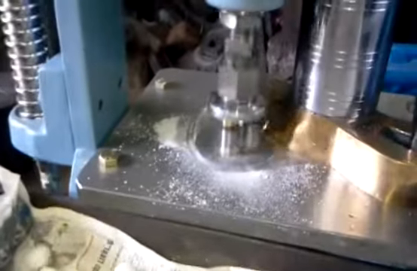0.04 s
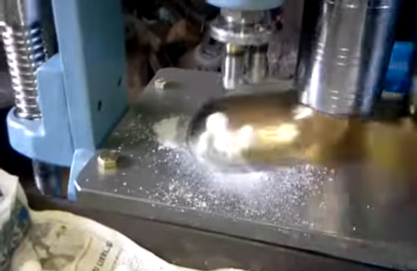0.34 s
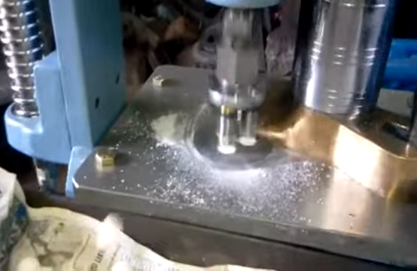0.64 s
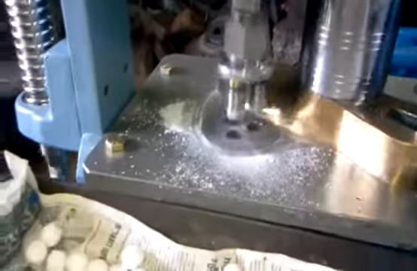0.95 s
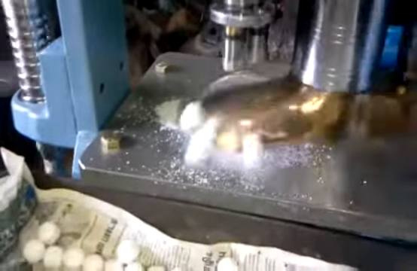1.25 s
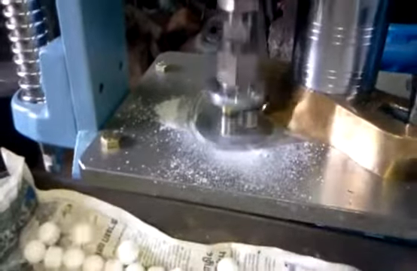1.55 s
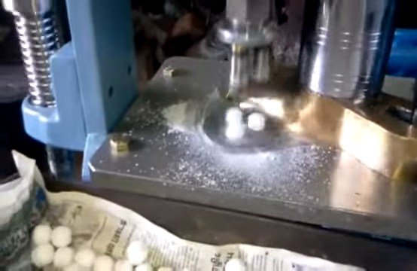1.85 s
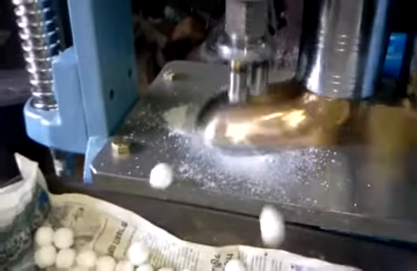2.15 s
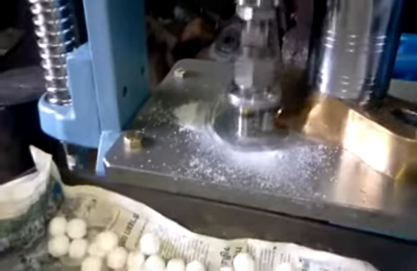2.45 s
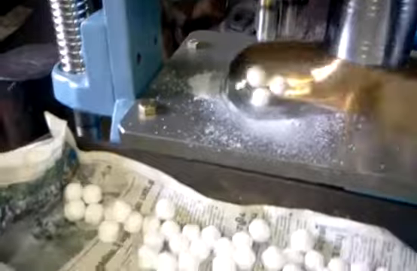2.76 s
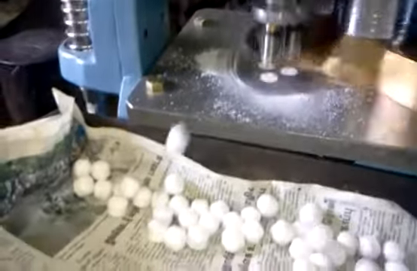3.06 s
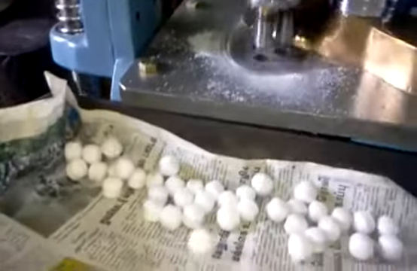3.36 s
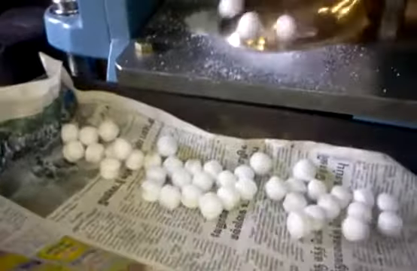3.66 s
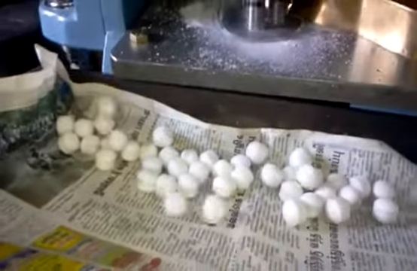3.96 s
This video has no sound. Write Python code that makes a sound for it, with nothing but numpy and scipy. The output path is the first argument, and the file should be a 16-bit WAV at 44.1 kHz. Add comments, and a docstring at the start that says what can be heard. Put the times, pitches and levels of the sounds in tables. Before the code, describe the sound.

Close, rhythmic clacking from a powder press repeats a little faster than once a second. Each cluster of ringing steel knocks trails into rattling and a light tap, while rubbing metal hisses and squeals faintly above the workshop's motor rumble.

```python
"""A workshop, close to a small single-punch press that stamps powder into balls.
Each turn of the cam knocks the feed shoe across the die: a tick, three hard clacks, a loose rattle,
then light taps and the clink of the punch dropping back. Every hit is a short crunch with a metal ring.
Between the clacks sliding steel sings thinly and squeals, over the motor's hum and a low rumble."""
import sys
import numpy as np
from scipy import signal
from scipy.fft import rfft, irfft
from scipy.io import wavfile
from scipy.ndimage import uniform_filter1d

SR = 44100
rng = np.random.default_rng(int(sys.argv[2]) if len(sys.argv) > 2 else 0)


def dump_mix(stems):
    """Bounce the given channels to the path in sys.argv[1] as a 16-bit WAV at rate SR."""
    frames = np.atleast_2d(stems).T  # one column per channel
    limited = np.clip(frames, -1, 1)  # hard clip at full scale
    pcm = np.round(limited * 32767).astype(np.int16)
    wavfile.write(sys.argv[1], SR, pcm)


N = 176400

# one stroke for each turn of the cam: start_s, level_db
CAM_STROKES = [(-0.264, -1.5), (0.5518, -4), (1.3684, -2.5), (2.1848, -2), (3.0009, -1.5), (3.8174, -4)]
# the knocks in every stroke: offset_s, level_db, rise_s, decay_s, bass_db, snap_db, treble_db, ring_db
STROKE_KNOCKS = [(-.0298, -25.5, 0.0024, 0.0029, -7, -4.5, 3.5, 3),
                 (-.0015, -14.5, 0.0047, 0.0032, -1, 6, 5.5, -3.5),
                 (0.0192, -20.5, 0.0023, 0.0093, -5.5, -4, -4, -3.5),
                 (0.0484, -14.5, 0.0033, 0.0069, -5.5, 5, 4.5, 2.5),
                 (.095, -15.5, 0.0048, 0.006, -0.5, 6.5, 6, 0.5),
                 (.107, -14.5, 0.0018, 0.0035, -18, -10.5, -5, -1),
                 (0.409, -44, 0.0053, 0.0061, 14, -4, -10, -1.5),
                 (.627, -32, 0.0036, 0.0041, -4.5, -5, 0, -12.5)]
# bounces of the loose linkage: start_s, level_db, snap_db, treble_db
LINKAGE_BOUNCES = [(0.013, -26.5, -11, -7), (0.723, -23, -7, 5), (0.728, -19, -1, -1.5),
                   (0.745, -21.5, 9.5, 1.5), (0.774, -31, 5, 0), (0.829, -27, -5, -4),
                   (1.298, -49.5, 2, 20), (1.389, -22.5, -8, -2), (1.537, -25, 1, 3), (1.543, -21, 6, 6),
                   (1.562, -20, 2.5, 0.5), (1.598, -27, 1.5, 0), (1.644, -27.5, -21, -4),
                   (2.35, -26, -9, 3), (2.358, -20.5, 2, 4.5), (2.379, -21.5, 2.5, 2.5),
                   (2.408, -32, 5.5, 4), (2.461, -27, -21, -7), (3.022, -26, -2, 4), (3.174, -24, 1, 4.5),
                   (3.179, -16, -4.5, -3), (3.198, -19, 4, -2), (3.24, -28, 2.5, -2),
                   (3.277, -26.5, -20, -21), (3.988, -25, 2.5, 3), (3.996, -25.5, 4, 11)]
# the punch dropping back once a turn: start_s, level_db
PUNCH_DROPS = [(0.280, -32.5), (1.096, -33.5), (1.911, -34.5), (2.729, -33), (3.544, -33.5)]
# tone of the steel-on-steel crunch: frequency_hz, level_db
CONTACT_SPECTRUM = [(100, -17.5), (260, -15.5), (420, -11), (760, -8), (930, -10), (1400, 7.5), (1800, 3),
                    (2380, -6), (2880, 0), (4100, -9.5), (4700, -4), (5800, -14), (6650, -7.5), (7500, -12),
                    (8600, -26)]
# tone of the cast frame ringing on: frequency_hz, level_db
FRAME_SPECTRUM = [(100, -11.5), (250, -12.5), (420, -1.5), (720, 3.5), (950, -3), (1450, 5), (2300, -5),
                  (3000, -13.5), (4000, -11.5), (6000, -16), (8500, -29.5)]
# modes of the frame and shoe: pitch_hz, level_db, t60_s
FRAME_MODES = [(391, -17, .36), (474, -18, .25), (810, -16, .2), (1345, 0, .06), (1442, -4.5, .24),
               (1659, 0, .1), (1874, -6.5, .17), (2700, -2, .06), (2810, -2, .09), (2934, -1.5, .08),
               (3440, -5, .08), (4773, -10, .15), (6720, -6, .05)]
# modes of the punch: pitch_hz, level_db, t60_s
CLINK_MODES = [(2635, 8, 0.088), (2944, 7.5, 0.057)]

# resonances of sliding steel, in four layers from low to high: pitch_hz, width_hz, level_db
LOW_SING_BANDS = [(2112, 43, 3.5), (2201, 40, -2.5), (1935, 60, -2)]
HIGH_SING_BANDS = [(4813, 300, 2), (6560, 990, 2)]
WHISTLE_BANDS = [(6430, 80, 0.0011), (6575, 230, 0.022)]
FIZZ_BANDS = [(7856, 340, 9.5), (8080, 69, 1.5), (7700, 1000, 5)]
# fader moves for those four layers: time_s, level_db
LOW_SING_FADER = [(0, -59), (.17, -50), (.85, -65), (1.3, -70), (1.72, -46), (2.14, -53.5), (2.8, -49),
                  (3.45, -55), (4, -48.5)]
HIGH_SING_FADER = [(0, -52), (.17, -53), (.72, -59), (.87, -62.5), (1.28, -60.5), (1.75, -51.5),
                   (2.13, -53.5), (2.66, -53), (3.25, -53), (3.44, -55.5), (3.58, -50), (4, -56)]
WHISTLE_FADER = [(0, -65), (.15, -48), (.38, -56.5), (.6, -44.5), (.9, -65.5), (1.4, -64), (1.8, -47),
                 (2.13, -52), (2.45, -52), (2.53, -46.5), (2.67, -45), (2.89, -50.5), (3.46, -54),
                 (3.59, -48), (3.72, -56)]
FIZZ_FADER = [(0, -66), (.24, -55.5), (.38, -66.5), (.52, -53), (.88, -84), (1.3, -77), (1.55, -56.5),
              (2, -53), (2.13, -61), (2.38, -53.5), (2.6, -57), (2.85, -51.5), (2.95, -61.5), (3.25, -50),
              (3.44, -64.5), (3.57, -50.5), (3.75, -62), (4, -53)]
# rubbing hiss that rides with the high singing: frequency_hz, level_db
HISS_SPECTRUM = [(1500, -19.5), (2500, 5), (4000, -1.5), (5600, -1), (7200, 3.5), (8600, -11.5)]
# notes where the steel binds: start_s, length_s, start_hz, end_hz, level_db
SQUEAL_NOTES = [(0.2, 0.029, 4740, 4730, -49), (0.461, 0.064, 2225, 2150, -48.5),
                (1.022, 0.017, 4750, 4670, -47), (1.66, 0.29, 2150, 2095, -51.5),
                (1.923, 0.21, 2105, 2053, -48), (3.727, 0.21, 4825, 4840, -45.5)]
# mains hum of the motor: pitch_hz, level_db
HUM_PARTIALS = [(99.5, -58), (199, -70)]
# running noise of motor and shop: frequency_hz, level_db
RUMBLE_SPECTRUM = [(10, 8.5), (28, 2.5), (40, -2.5), (55, -11), (90, -18), (140, -28), (200, -34),
                   (270, -33.5), (420, -29), (750, -31), (1000, -35.5), (1600, -29), (2600, -35.5),
                   (4500, -39), (8500, -55.5)]

SNAP_HZ, SNAP_WIDTH_HZ = 2910, 740  # the band in which a hard contact snaps
RING_DB, RING_DECAY_S, MODES_DB = -5.5, 0.02, -11
ROOM_DB, ROOM_T60_S = -19, 0.68
LIKENESS, KNOCK_SPREAD_DB = 0.62, -1.5  # likeness: share of a knock's noise repeated at every stroke
CHATTER_WINDOW_S, CHATTER_DB, CHATTER_SPREAD_DB = 0.16, -31.5, -5
RUMBLE_DB, RUMBLE_FLUTTER_DB, SING_FLUTTER_DB = -31, 0.7, 1.17
CEILING, TOP_HZ = 0.85, 8400


def cam_knocks():
    """The cam knocks the shoe across the die: the same row of hits each turn, never quite alike."""
    out = np.zeros(N)
    for offset_s, level_db, *shape in STROKE_KNOCKS:
        repeated = hit_noise()
        for start_s, stroke_db in CAM_STROKES:
            noise = np.sqrt(LIKENESS) * repeated + np.sqrt(1 - LIKENESS) * hit_noise()
            gain = undb(level_db + stroke_db + KNOCK_SPREAD_DB * rng.standard_normal())
            add(out, gain * steel_hit(noise, *shape), start_s + offset_s)
    return out


def hit_noise():
    """Raw noise for one hit: a row for the crunch and a row for the ring."""
    return rng.standard_normal((2, 24000))


def steel_hit(noise, rise_s, decay_s, bass_db, snap_db, treble_db, ring_db, modes=FRAME_MODES):
    """Steel meets steel: a short crunch, the frame's dense ring, clear modes and the room's tail."""
    t = np.arange(noise.shape[1]) / SR
    attack = np.minimum(t / rise_s, 1) ** 2
    since_peak = np.maximum(t - rise_s, 0)
    crunch = colour(noise[0], CONTACT_SPECTRUM, bass_db, snap_db, treble_db)
    crunch *= np.exp(-since_peak / decay_s)
    frame_tail = undb(RING_DB) * np.exp(-since_peak / RING_DECAY_S)
    room_tail = undb(ROOM_DB - 60 * since_peak / ROOM_T60_S)
    ring = colour(noise[1], FRAME_SPECTRUM, bass_db, snap_db, treble_db / 2) * (frame_tail + room_tail)
    tones = 0
    for pitch_hz, level_db, t60_s in modes:
        detune, strength = rng.standard_normal(2)
        tone = np.sin(2 * np.pi * (pitch_hz * (1 + 0.0018 * detune) * t + rng.random()))
        struck_db = level_db + np.pi * np.clip(strength, -1, 1)
        tones += tone * undb(struck_db - 60 * since_peak / t60_s)
    return attack * (crunch + undb(ring_db) * (ring + undb(MODES_DB) * tones))


def linkage_rattle():
    """The loose linkage bounces unevenly and settles as the shoe swings back."""
    out = np.zeros(N)
    for start_s, level_db, snap_db, treble_db in LINKAGE_BOUNCES:
        bounce = steel_hit(hit_noise(), rise_s=0.0018, decay_s=0.007, bass_db=0,
                           snap_db=snap_db, treble_db=treble_db, ring_db=-5.5)
        add(out, undb(level_db) * bounce, start_s)
    return out


def punch_clinks():
    """The punch drops back between the bursts, with a light knock that rings its own modes."""
    out = np.zeros(N)
    for start_s, level_db in PUNCH_DROPS:
        clink = steel_hit(hit_noise(), rise_s=0.0015, decay_s=0.0045, bass_db=2,
                          snap_db=7, treble_db=0, ring_db=-1, modes=CLINK_MODES)
        add(out, undb(level_db) * clink, start_s)
    return out


def loose_chatter(ticks_per_stroke=8):
    """Loose parts tick at random among the hard clacks while the shoe is shaken."""
    out = np.zeros(N)
    for start_s, stroke_db in CAM_STROKES[1:]:
        for _ in range(ticks_per_stroke):
            gain = undb(CHATTER_DB + stroke_db + CHATTER_SPREAD_DB * rng.standard_normal())
            tick = steel_hit(hit_noise(), rise_s=0.00045, decay_s=0.0013, bass_db=3,
                             snap_db=-0.5, treble_db=-4.5, ring_db=-3.5)
            add(out, gain * tick, start_s + CHATTER_WINDOW_S * rng.random())
    return out


def sliding_steel():
    """Rubbing parts hiss and sing in narrow bands, swelling and fading as the contact changes."""
    hissy_sing = resonate(HIGH_SING_BANDS) + colour(rng.standard_normal(N), HISS_SPECTRUM)
    low = resonate(LOW_SING_BANDS) * ride_fader(LOW_SING_FADER)
    high = hissy_sing * ride_fader(HIGH_SING_FADER)
    whistle = resonate(WHISTLE_BANDS) * ride_fader(WHISTLE_FADER)
    fizz = resonate(FIZZ_BANDS) * ride_fader(FIZZ_FADER)
    return low + high + whistle + fizz


def binding_squeals():
    """Where the steel binds it squeals on one thin, wavering note that usually sags in pitch."""
    out = np.zeros(N)
    waver = 1 + 0.005 * walk(200)
    flutter = undb(2.5 * walk(90))
    for start_s, length_s, start_hz, end_hz, level_db in SQUEAL_NOTES:
        n = int(length_s * SR)
        pitch_hz = np.linspace(start_hz, end_hz, n) * waver[:n]
        note = np.sqrt(2) * np.sin(2 * np.pi * np.cumsum(pitch_hz) / SR)
        envelope = signal.windows.tukey(n, 0.5) * flutter[:n]
        add(out, undb(level_db) * envelope * note, start_s)
    return out


def motor():
    """The bed: mains hum inside the fluttering rumble of motor and shop."""
    t = np.arange(N) / SR
    hum = sum(undb(level_db) * np.sqrt(2) * np.sin(2 * np.pi * (pitch_hz * t + rng.random()))
              for pitch_hz, level_db in HUM_PARTIALS)
    rumble = colour(rng.standard_normal(N), RUMBLE_SPECTRUM)
    return hum + rumble * undb(RUMBLE_DB + RUMBLE_FLUTTER_DB * walk(50))


def colour(noise, spectrum, bass_db=0, snap_db=0, treble_db=0):
    """EQ white noise to a spectrum at the same power, then trim its bass, snap and treble."""
    f = np.arange(len(noise) // 2 + 1) * SR / len(noise) + 1
    hz, db = np.array(spectrum).T
    gain = unit(undb(np.interp(np.log(f), np.log(hz), db)))
    bass = bass_db / (1 + (f / 900) ** 4)
    snap = snap_db * np.exp(-((f - SNAP_HZ) / SNAP_WIDTH_HZ) ** 2)
    treble = treble_db / (1 + (4000 / f) ** 6)
    return irfft(rfft(noise) * gain * undb(bass + snap + treble), len(noise))


def resonate(bands):
    """Noise held in narrow resonances."""
    out = 0
    for pitch_hz, width_hz, level_db in bands:
        b, a = signal.iirpeak(pitch_hz, pitch_hz / width_hz, fs=SR)
        band = signal.lfilter(b, a, signal.lfilter(b, a, rng.standard_normal(N)))
        out += undb(level_db) * unit(band)
    return unit(out)


def ride_fader(moves):
    """Gain that follows the fader moves, with a quick flutter on top."""
    time_s, level_db = np.array(moves).T
    return undb(np.interp(np.arange(N) / SR, time_s, level_db) + SING_FLUTTER_DB * walk(30))


def walk(rate_hz):
    """Smooth random wander at rms 1."""
    span = int(SR / rate_hz)
    return unit(uniform_filter1d(uniform_filter1d(rng.standard_normal(N), span), span))


def add(out, x, start_s):
    """Mix x in at a time in seconds."""
    i = int(round(start_s * SR))
    a, b = max(i, 0), min(i + len(x), N)
    if b > a:
        out[a:b] += x[a - i:b - i]


def undb(db):
    """Decibels to gain."""
    return 10 ** (np.asarray(db) / 20)


def unit(x):
    """Scale to rms 1."""
    return x / np.sqrt(np.mean(x ** 2))


def scene():
    """The whole press in mono: hits up front, singing steel and motor behind."""
    hits = cam_knocks() + linkage_rattle() + punch_clinks()
    running = sliding_steel() + binding_squeals() + motor()
    return (hits + running + loose_chatter())[None]


def record(dry):
    """Soft-clip the highest peaks, then roll off the top steeply."""
    rounded = CEILING * np.tanh(dry / CEILING)
    lowpass = signal.cheby1(12, 0.3, TOP_HZ, fs=SR, output="sos")
    return signal.sosfilt(lowpass, rounded)


dry = scene()
out = record(dry)
dump_mix(out)
```